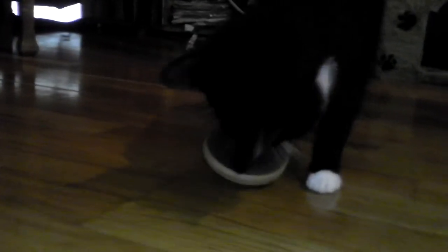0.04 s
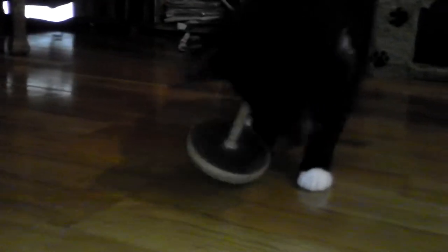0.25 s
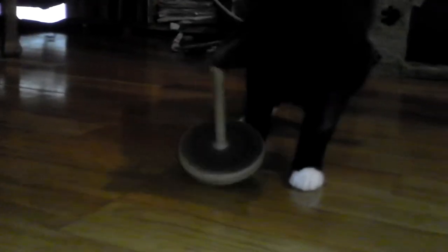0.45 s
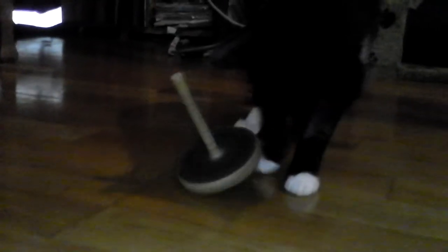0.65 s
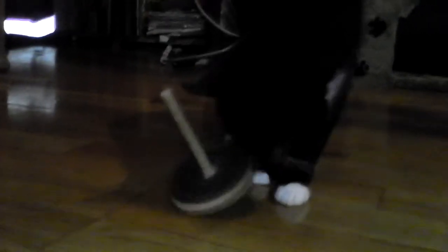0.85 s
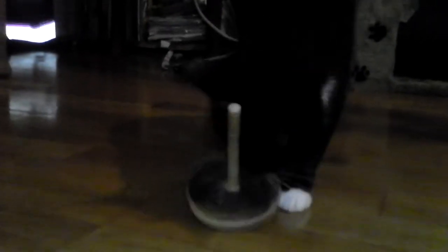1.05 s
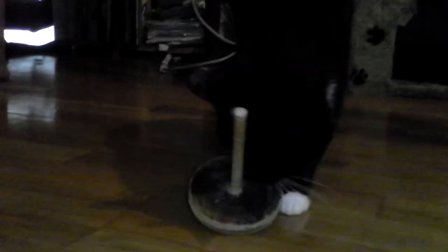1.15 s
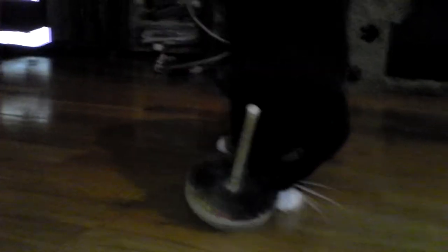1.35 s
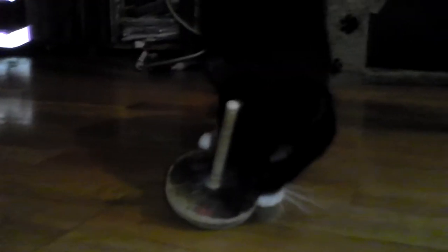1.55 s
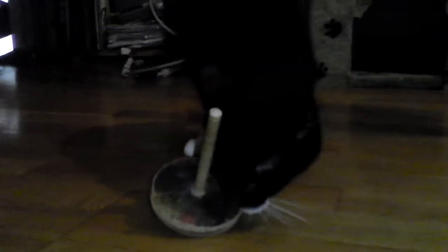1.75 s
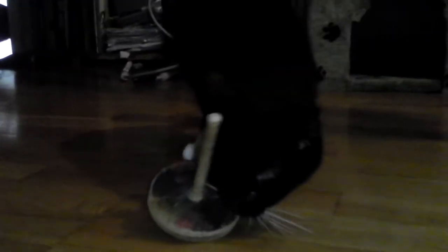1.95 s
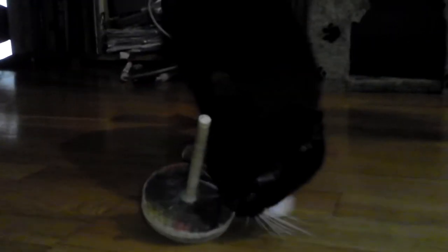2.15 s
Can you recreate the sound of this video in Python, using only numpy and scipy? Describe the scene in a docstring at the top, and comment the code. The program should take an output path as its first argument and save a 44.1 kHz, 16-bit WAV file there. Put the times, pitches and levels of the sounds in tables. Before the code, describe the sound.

A round wooden toy knocks and rattles to rest on floorboards, then gets softly nudged.

```python
"""Cat and wobbling toy

A cat pushes a toy with a round wooden base across a wooden floor. The disc tips, knocks on its rim,
bounces, rocks faster and faster and settles; later it is nudged softly. Each contact rings short modes
of disc and floor. Rubbing and rolling rustle. The room rings briefly, over a faint hiss and a whine."""
import sys
import numpy as np
from scipy import signal
from scipy.fft import rfft, irfft
from scipy.io import wavfile

SR = 44100
rng = np.random.default_rng(int(sys.argv[2]) if len(sys.argv) > 2 else 0)


def waveform_to_disk(signal):
    """Save audio, clipped to [-1, 1], as 16-bit WAV at the path in sys.argv[1]."""
    frames = np.transpose(np.atleast_2d(signal))
    scaled = np.clip(frames, -1, 1) * 32767
    samples = np.round(scaled).astype(np.int16)
    wavfile.write(sys.argv[1], SR, samples)


N = 97020
TIME = np.arange(N) / SR
CUTOFF_HZ = 12000


# Each row: start in seconds, thud, clack and tick levels in dB, lowest mode in Hz, bite centre in Hz.
RIM_KNOCKS = [(0.2232,-1.5,-9.5,-19,417,1950), (0.2306,-1,-13.5,-18.5,417,2150), (0.2545,0,7.5,-8,408,4100),
              (0.259,-15,-36,-24,410,1870), (.3814,0,-2,-10,423,3500), (.4174,6,3,-12,432,2600),
              (0.5448,6.5,-1.5,-11.5,418,2950), (0.555,-3,-19,-38,425,3060),
              (0.5621,-11,-35.5,-43.5,390,3000), (.593,2,2.5,-5.5,430,2080),
              (0.6233,-2.5,-8,-19.5,425,3020), (.633,-4,-14,-54,404,2970), (0.6637,0,-4,-23,419,3010),
              (.6819,-1.5,-6,-18.5,400,3000), (0.7177,6.5,5,-12,411,2500), (.732,-1.5,-22,-45,426,2980),
              (0.7994,3.5,6,-5.5,403,3080), (.8355,-0.5,-0.5,-26.5,404,2070), (0.841,-8,-10.5,-23,425,3000),
              (0.857,-0.5,-2.5,-18,390,3200), (0.8964,1,-12,-26.5,415,3000),
              (0.9122,2.5,-4.5,-16.5,379,2830), (0.9247,-5.5,-24,-37,416,3000),
              (.946,-8.5,-19,-36.5,408,3000), (.9583,-3,-13,-35.5,415,1980),
              (0.9679,-2.5,-3,-19.5,379,4500), (0.9847,-1.5,-8.5,-19.5,404,4000),
              (0.9979,-5,-13,-38,415,4000), (1.0107,-6.5,-18,-29.5,401,4040), (1.0328,-8,-13,-31,400,2920),
              (1.0378,-7.5,-16.5,-36,417,2920), (1.0625,-10.5,-31,-27,436,3050),
              (1.0739,-4.5,-24,-25.5,402,3630), (1.0839,-4.5,-12.5,-40,388,3600),
              (1.092,-5.5,-38,-29.5,398,2960), (1.1083,-13,-20,-39,398,3400),
              (1.113,-11,-14.5,-42.5,402,3400)]

def rim_knocks():
    """Yield (start, force, lowest mode). The tilt brings out one band, the bite, more on hard landings."""
    thud, rest = split(signal.unit_impulse(SR // 20), hz=847)
    clack, tick = split(rest, hz=1797)
    bite_octaves = .2
    bite_edges = 2 ** (np.array([-.5, .5]) * bite_octaves)
    for start_s, thud_db, clack_db, tick_db, lowest_hz, bite_hz in RIM_KNOCKS:
        force = from_db(thud_db) * thud + from_db(clack_db) * clack + from_db(tick_db) * tick
        bite = from_db(3 + 1.02 * tick_db) * butter(force, bite_hz * bite_edges, "band", order=1)
        yield start_s, force + bite, lowest_hz


# Each row: start in seconds, level in dB.
CAT_NUDGES = [(0.0126,-14.5), (0.0905,-12), (0.1197,-12), (0.1241,-9.5), (.1677,-5.5), (0.2079,-11),
              (1.17,-19.5), (1.4339,-20.5), (1.954,-17.5), (2.0399,-8), (2.0446,-11.5), (2.108,-23),
              (2.159,-23)]

def cat_nudges():
    """Yield (start, force, lowest mode) for each dull bump of the cat against the toy."""
    bump, _ = split(signal.unit_impulse(SR // 20), hz=456)
    for start_s, db in CAT_NUDGES:
        yield start_s, from_db(db) * bump, WOOD_MODES[0][0]


# Each row: frequency in Hz, level in dB, T60 in seconds.
WOOD_MODES = [(410,-12,0.024), (485.6,-21,0.046), (686,-17,0.0086), (892,-23.5,0.039), (1090,-21,0.018),
              (1312,-24,0.041), (1485,-28,0.069), (1628,-33.5,0.084), (1748,-22,0.032), (1842,-23.5,0.044),
              (2260,-44,0.023), (2495,-18.5,0.014), (2740,-30,0.0078), (3050,-24,0.016), (3540,-29,0.012),
              (3970,-27,0.014), (5470,-22,0.011), (6370,-19,0.019)]

def disc(contacts):
    """Contacts click and ring disc and floor. Each spot on the rim strikes the modes differently."""
    mode_hz, mode_db, t60_s = np.transpose(WOOD_MODES)
    detune_share, spread_db = .012, 2.2
    wood, forces = np.zeros((2, N + SR))
    for start_s, force, lowest_hz in contacts:
        detune, strength = rng.standard_normal((2, len(mode_hz)))
        strength[0] = 0   # the lowest mode answers evenly all round the rim
        hz = mode_hz * (1 + detune_share * detune)
        hz[0] = lowest_hz
        knock = signal.fftconvolve(force, ringing(zip(hz, mode_db + spread_db * strength, t60_s)))
        start = int(start_s * SR)
        wood[start:start + len(knock)] += knock
        forces[start:start + len(force)] += force
    wood = butter(wood[:N], 322, "high")
    wood = butter(wood, 4230, "low", order=5)   # contact time rounds off the treble
    click = butter(forces[:N], [6040, 9500], "band")
    return from_db(.5) * wood + from_db(-28) * click


# Each row: start in seconds, length in seconds, rustle level in dB.
RUBS_AND_ROLLS = [(-.02, 0.29, -58), (1.077, 0.078, -63), (2.005, 0.091, -57.5), (2.082, 0.15, -62.5)]

def rubs_and_rolls():
    """Swells of rustle and rumble as the cat rubs the toy or its rim rolls to rest."""
    swells = sum(from_db(db) * np.sin(np.pi * np.clip((TIME - start_s) / length_s, 0, 1))
                 for start_s, length_s, db in RUBS_AND_ROLLS)
    rustle = noise([1000, 3930], "band")
    rumble = from_db(10.5) * noise([196, 450], "band")
    return swells * (rustle + rumble)


# Each row: delay in seconds, gain in dB.
REFLECTIONS = [(.0051, -16.5), (.0069, -14.5), (0.0115, -16.5), (0.03, -24.5)]

def early_reflections(x):
    """Nearby furniture and walls each return one delayed copy."""
    return sum(from_db(db) * np.interp(TIME - delay_s, TIME, x, left=0) for delay_s, db in REFLECTIONS)


# Each row: frequency in Hz, gain in dB, T60 in seconds.
STANDING_WAVES = [(388.5, -58.5, .25), (551, -71.5, 0.38), (2310, -46.5, 0.26)]

def standing_waves(x):
    """The room's modes ring on after each contact."""
    return convolve(x, ringing(STANDING_WAVES))


# Each row: band centre in Hz, gain in dB, T60 in seconds.
TAIL_BANDS = [(116,-5.5,.9), (253.4,-9.5,0.37), (410,-10.5,0.25), (584,-15,0.26), (935,-18,0.41),
              (1410,-9.5,0.35), (1930,-14.5,.27), (2360,-11,0.26), (3860,-16.5,0.34), (5500,-14,0.22),
              (9300,-14,.1)]

def room_tail(x):
    """Diffuse reflections build and die band by band. The disc moves, so no two tails are alike."""
    delay_s, build_s = .00073, .015
    centres_hz = np.array(TAIL_BANDS)[:, 0]
    edges_hz = np.r_[centres_hz[0] * .75, np.sqrt(centres_hz[:-1] * centres_hz[1:]), CUTOFF_HZ]
    onset = np.clip((TIME - delay_s) / build_s, 0, 1)
    tail = 0
    for (_, db, t60_s), band_hz in zip(TAIL_BANDS, zip(edges_hz, edges_hz[1:])):
        decay = (onset * from_db(-60 * TIME / t60_s)) ** 2
        energy = convolve(butter(x, band_hz, "band", order=3) ** 2, decay / decay.sum())
        tail += from_db(db) * np.sqrt(np.abs(energy)) * noise(band_hz, "band", order=3)
    return tail


# Each row: frequency in Hz, relative spectral density in dB.
HISS_SPECTRUM = [(25, -19), (55, -14.5), (75, -18), (100, -4.5), (200, 0), (400, -2.5), (700, -6.5),
                 (1200, -9.5), (2500, -19), (4000, -25), (6000, -31), (10000, -39.5), (12500, -43.5)]

def hiss():
    """Even room tone, strongest in the bass."""
    hz, db = np.transpose(HISS_SPECTRUM)
    bins_hz = np.fft.rfftfreq(N, 1 / SR)
    colour = from_db(np.interp(np.log(bins_hz + 1), np.log(hz), db))
    return from_db(-51.5) * unit_rms(irfft(rfft(rng.standard_normal(N)) * colour, N))


# Each row: frequency in Hz, RMS level in dB.
WHINE_TONES = [(441, -57.5), (879, -55)]

def whine():
    """Two steady tones waver slightly in pitch together."""
    waver_hz = .66 * noise(10, "low")
    return sum(from_db(db) * np.sqrt(2) * np.sin(2 * np.pi * np.cumsum(hz + waver_hz) / SR)
               for hz, db in WHINE_TONES)


def from_db(db):
    """Decibels to gain."""
    return 10 ** (np.asarray(db) / 20)


def unit_rms(x):
    """Scale to RMS 1."""
    return x / np.sqrt(np.mean(x ** 2) + 1e-20)


def butter(x, hz, kind, order=2):
    """Butterworth filter."""
    return signal.sosfilt(signal.butter(order, hz, kind, fs=SR, output="sos"), x + 1e-18)


def noise(hz, kind, order=2):
    """Filtered noise at RMS 1."""
    return unit_rms(butter(rng.standard_normal(N), hz, kind, order))


def split(x, hz):
    """The parts below and above a crossover."""
    return butter(butter(x, hz, "low"), hz, "low"), butter(butter(x, hz, "high"), hz, "high")


def convolve(x, response):
    """Play a sound through an impulse response."""
    return signal.fftconvolve(x, response)[:N]


def ringing(modes):
    """Impulse response of damped modes."""
    t = TIME[:SR // 3]
    ring = sum(from_db(db - 60 * t / t60_s) * np.cos(2 * np.pi * hz * t) for hz, db, t60_s in modes)
    ring[0] *= .5
    return ring


def scene():
    """Toy, room and background in mono."""
    toy = disc([*rim_knocks(), *cat_nudges()])
    room = early_reflections(toy) + standing_waves(toy) + room_tail(toy)
    return (toy + room + rubs_and_rolls() + hiss() + whine())[None]


def record(dry):
    """Steep elliptic low-pass."""
    return signal.sosfilt(signal.ellip(8, .2, 70, CUTOFF_HZ, fs=SR, output="sos"), dry)


dry = scene()
out = record(dry)
waveform_to_disk(out)
```